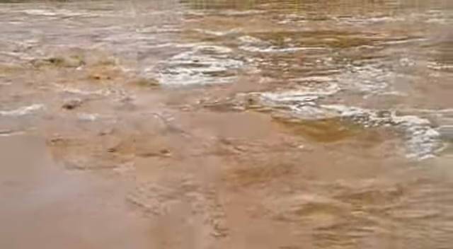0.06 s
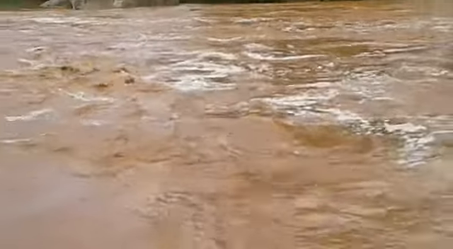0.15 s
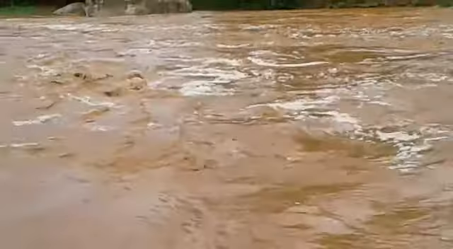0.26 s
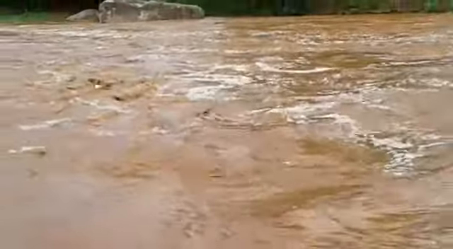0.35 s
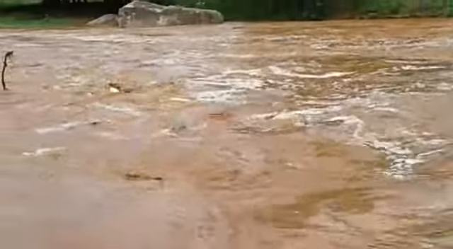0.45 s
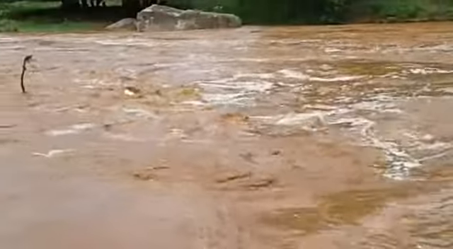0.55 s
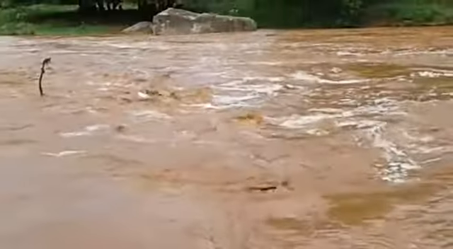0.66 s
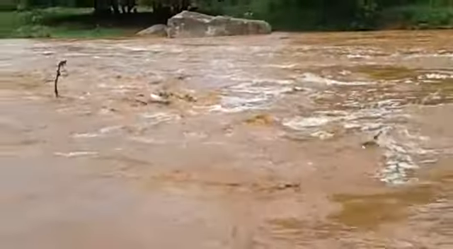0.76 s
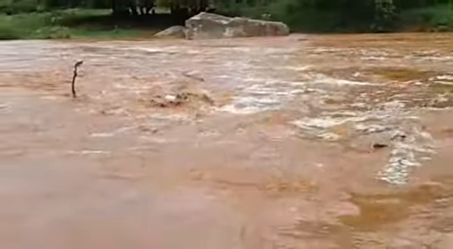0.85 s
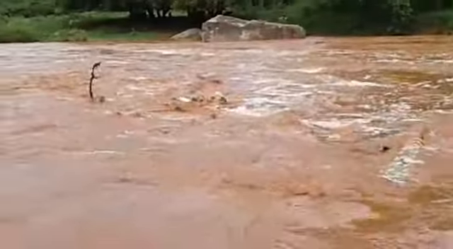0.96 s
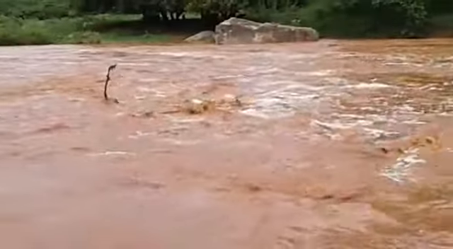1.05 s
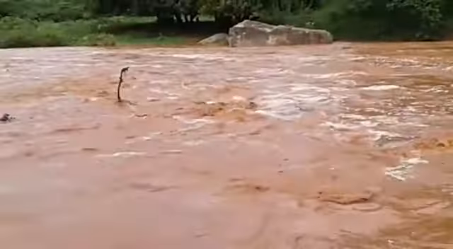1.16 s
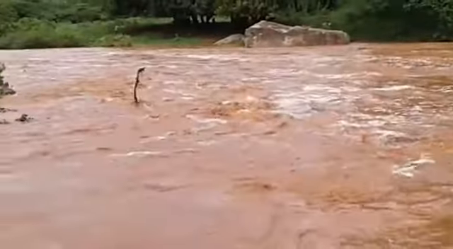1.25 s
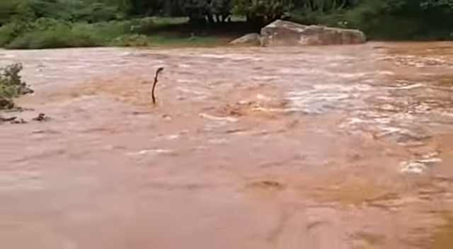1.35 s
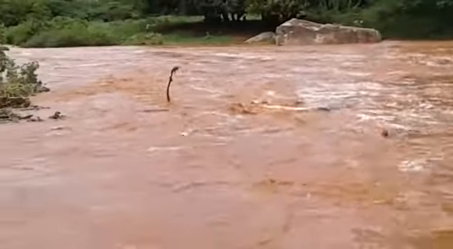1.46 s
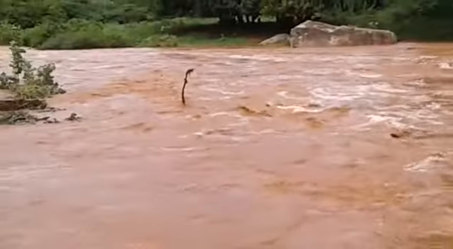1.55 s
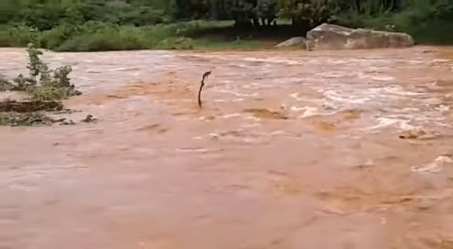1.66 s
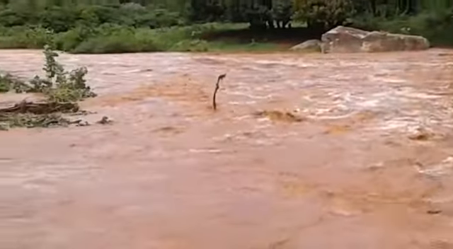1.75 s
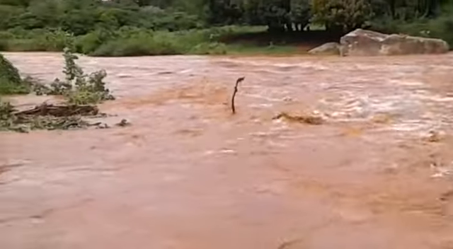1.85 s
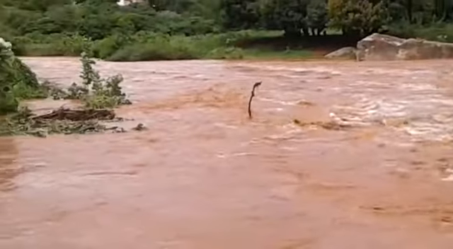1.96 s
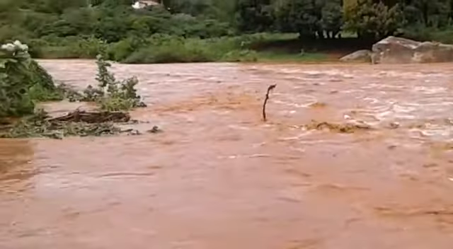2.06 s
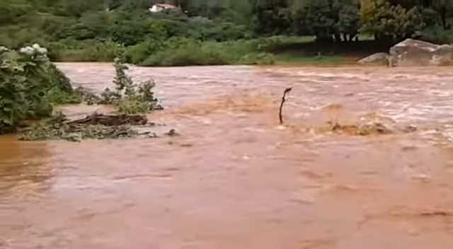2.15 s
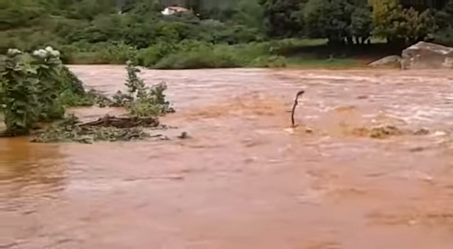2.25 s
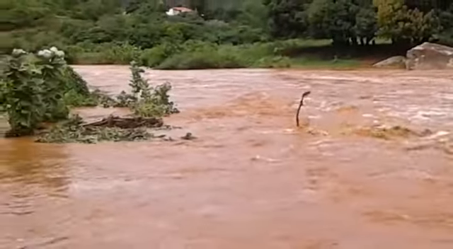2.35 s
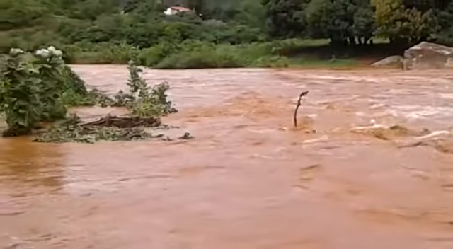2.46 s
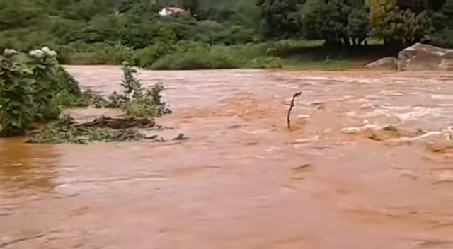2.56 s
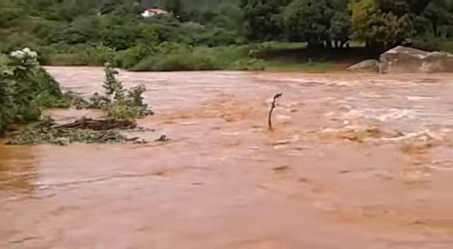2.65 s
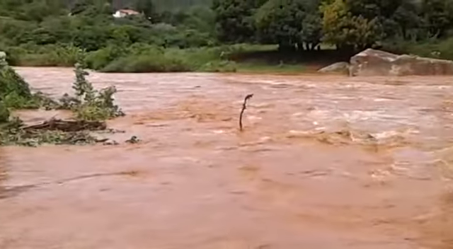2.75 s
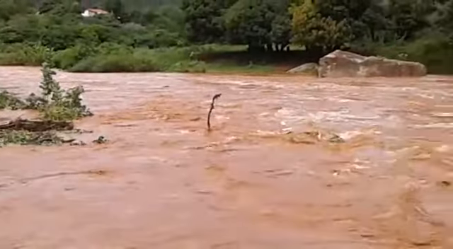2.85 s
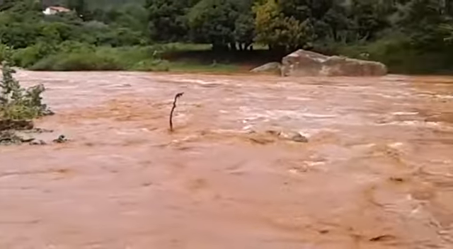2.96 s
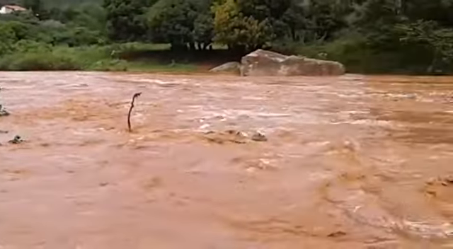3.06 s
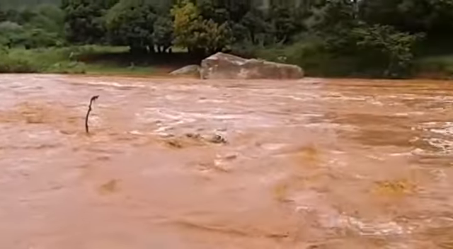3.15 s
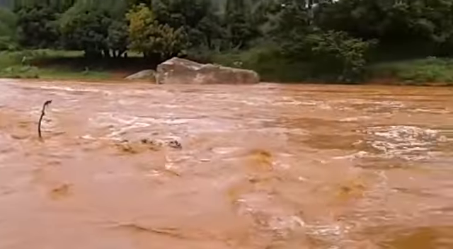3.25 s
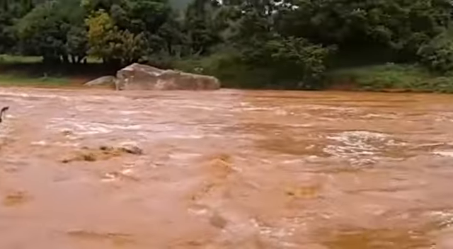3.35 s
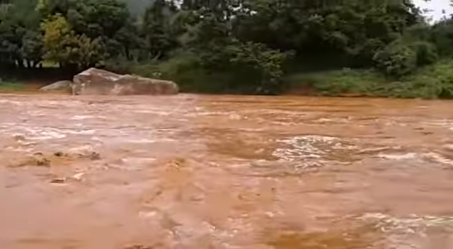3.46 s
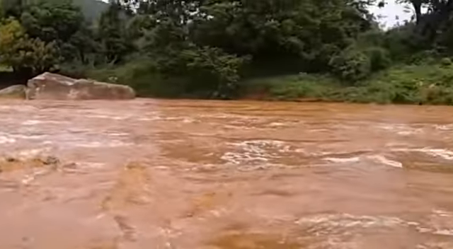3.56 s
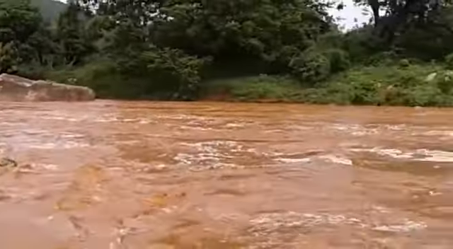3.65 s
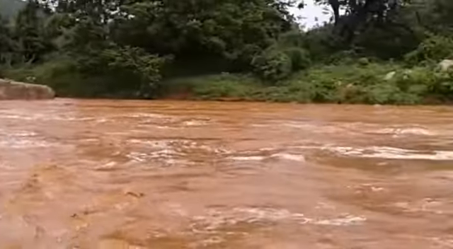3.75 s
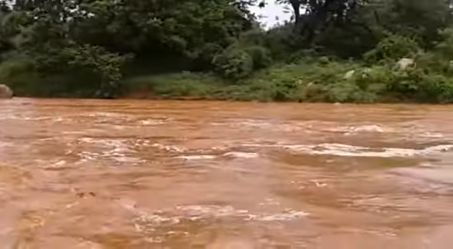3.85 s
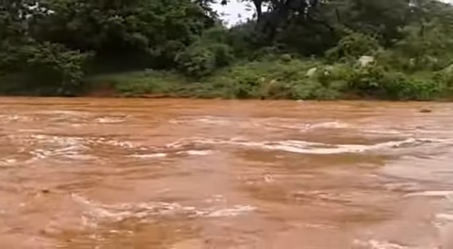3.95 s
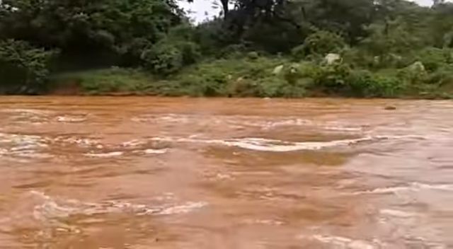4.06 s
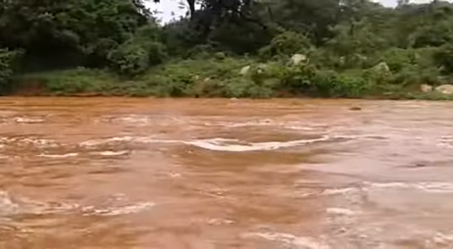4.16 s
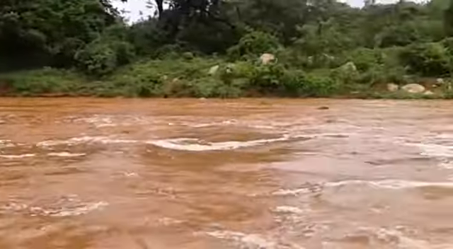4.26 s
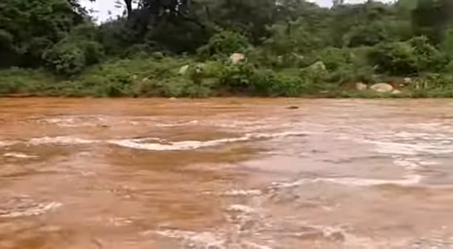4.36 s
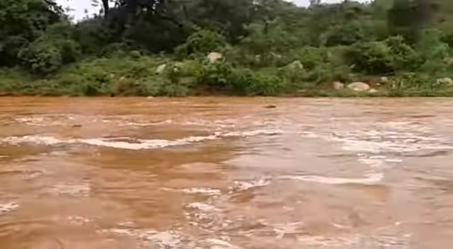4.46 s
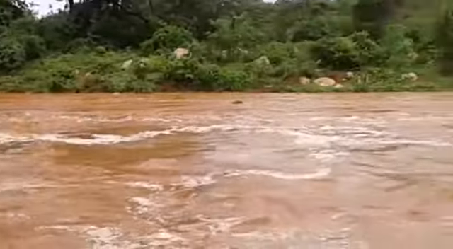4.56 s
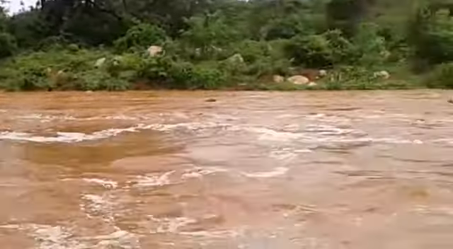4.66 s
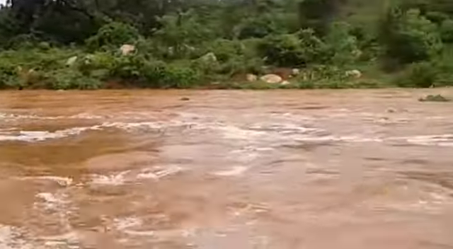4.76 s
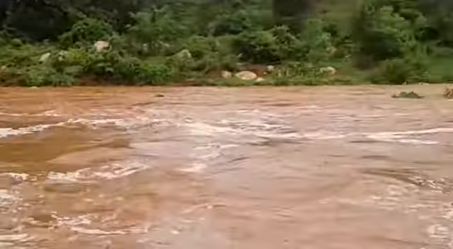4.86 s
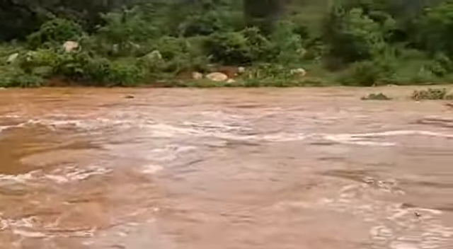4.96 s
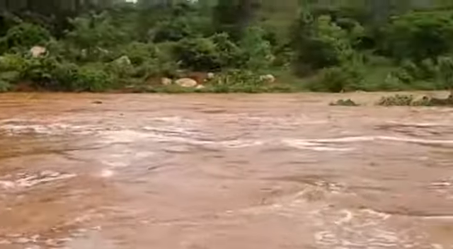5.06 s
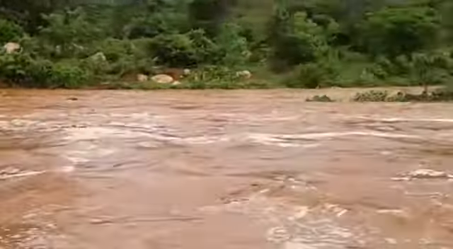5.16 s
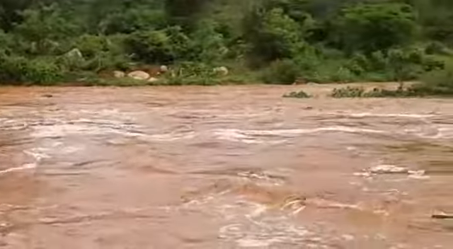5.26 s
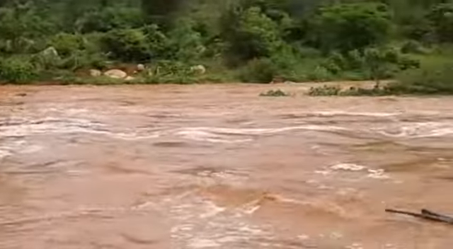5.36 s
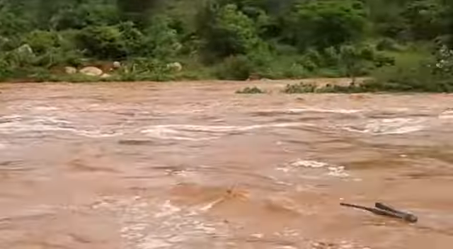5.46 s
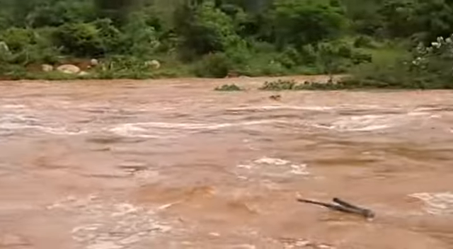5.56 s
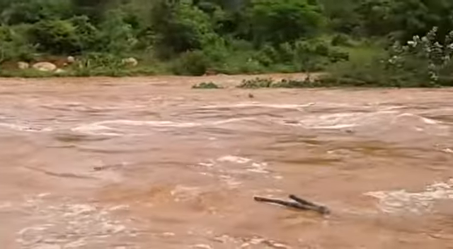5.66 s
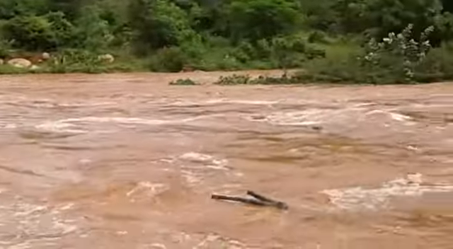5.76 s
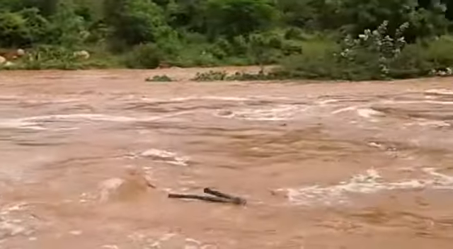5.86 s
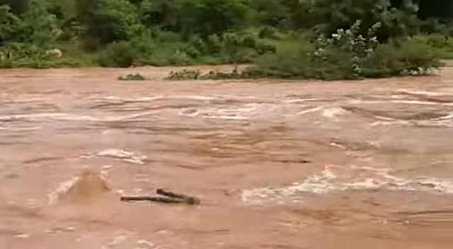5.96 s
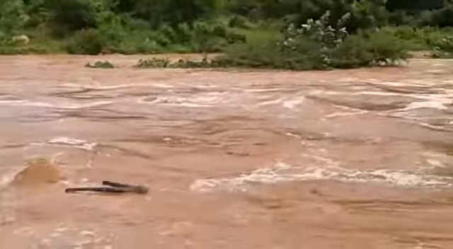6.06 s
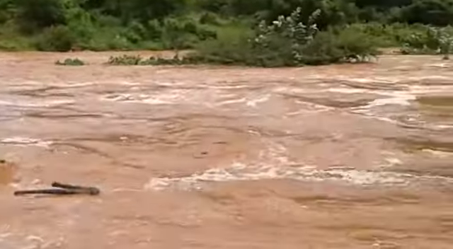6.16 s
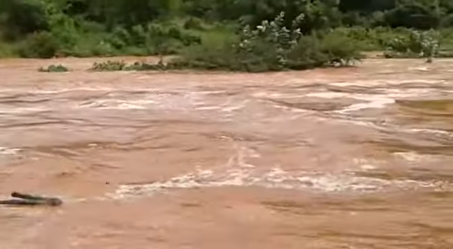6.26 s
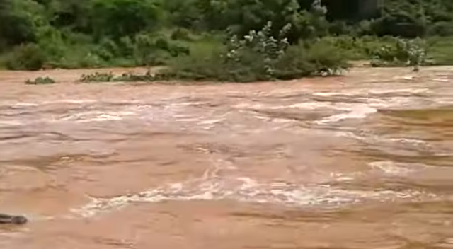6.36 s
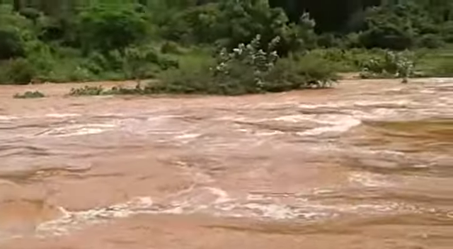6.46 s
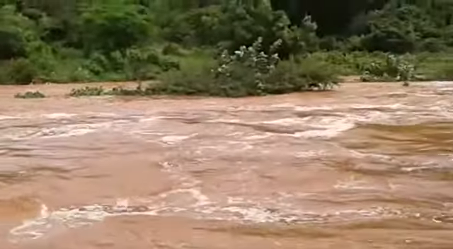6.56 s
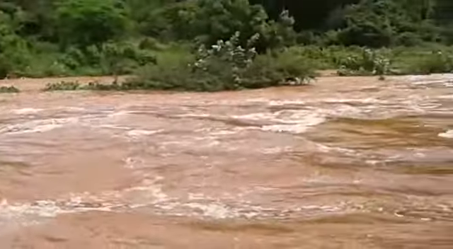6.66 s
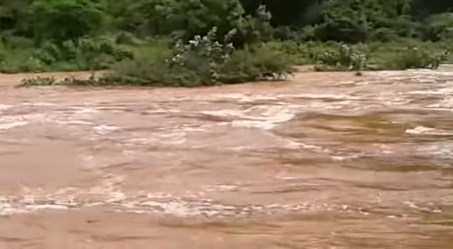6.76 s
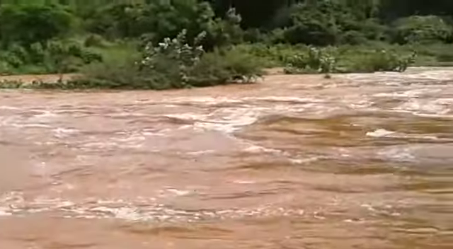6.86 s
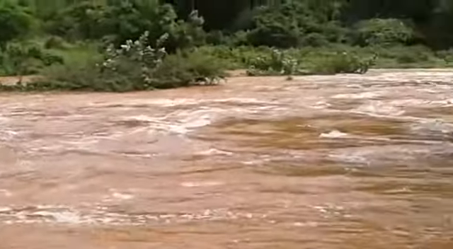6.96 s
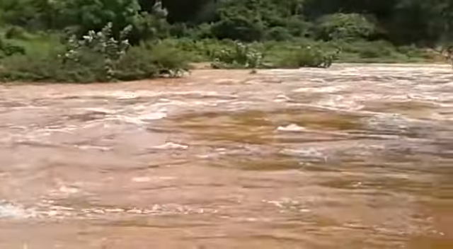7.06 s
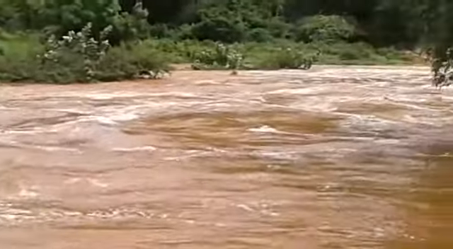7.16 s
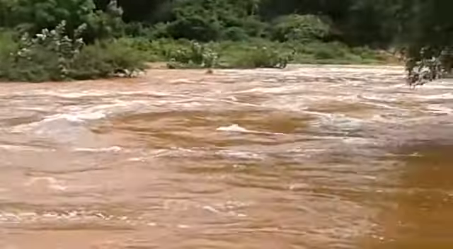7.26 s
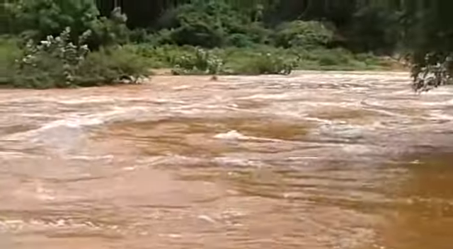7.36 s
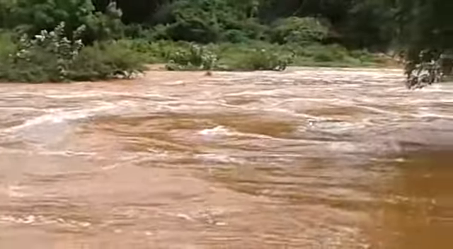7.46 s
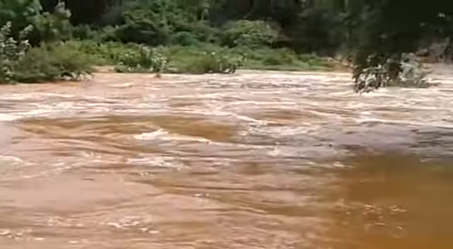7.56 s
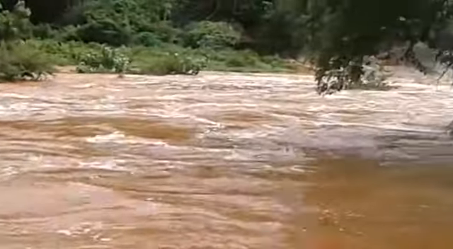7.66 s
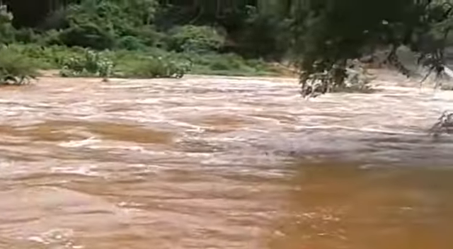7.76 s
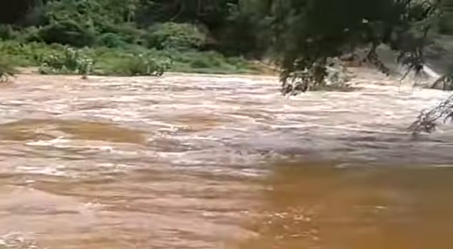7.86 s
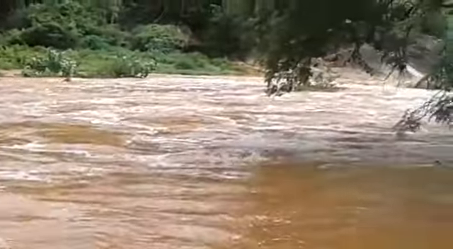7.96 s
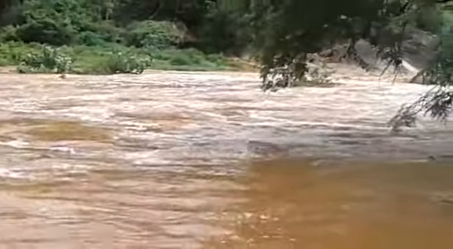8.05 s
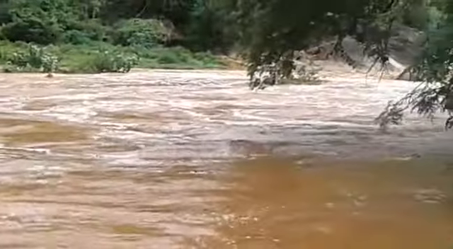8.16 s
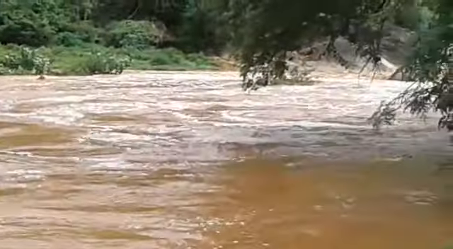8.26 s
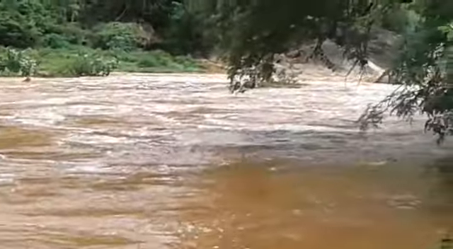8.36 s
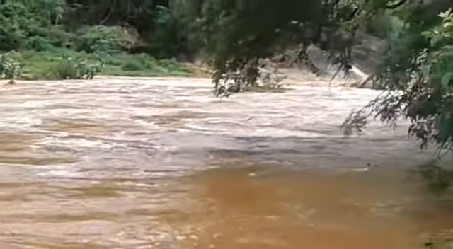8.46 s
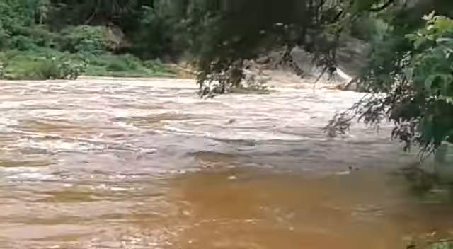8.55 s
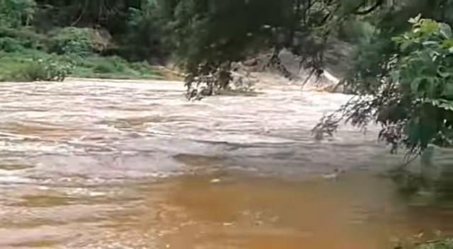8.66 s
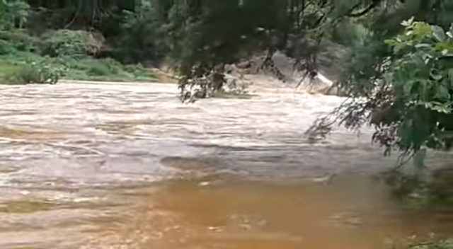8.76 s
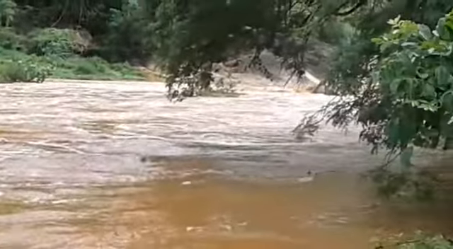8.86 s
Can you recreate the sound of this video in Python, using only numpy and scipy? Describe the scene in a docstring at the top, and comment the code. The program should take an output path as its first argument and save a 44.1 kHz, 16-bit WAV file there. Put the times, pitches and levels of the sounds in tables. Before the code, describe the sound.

After a moment of silence, dense river roar fades in and stays constant, with splashes and soft gurgles. Far off, a high insect buzz pulses and a small bird sings gliding whistles around the middle. Occasional close drips pop out. Later, hard clicks, thumps and short rubs from fingers on the hand-held microphone rise above the muffled water, which brightens sharply at the end.

```python
"""A swollen river rushes past a small hand-held microphone: shaped noise, with bubbles ringing in the eddies.
On the far bank a bird sings in gliding whistles and an insect trills, a tone struck in quick pulses.
Small ticks and drips fall close by. Late on, fingers shift on the casing: they knock (spikes and a swing back),
rub in short strokes of noise, creep with a low rumble and half cover the port, dulling the water."""
import sys
import numpy as np
from scipy import signal
from scipy.fft import rfft, irfft
from scipy.io import wavfile
from scipy.ndimage import uniform_filter1d

SR = 44100
rng = np.random.default_rng(int(sys.argv[2]) if len(sys.argv) > 2 else 0)


def volts(x):
    """Linear amplitude factor 10**(x/20) for a level x in dB, scalar or array-like."""
    e = np.asarray(x, float) / 20
    return 10 ** e


def unload_wav(signal):
    """Save mono or channel-first audio to the path in sys.argv[1] as 16-bit WAV at rate SR, clipped to [-1, 1]."""
    wavfile.write(
        sys.argv[1],
        SR,
        np.round(np.clip(np.atleast_2d(signal).T, -1, 1) * 32767).astype(np.int16),
    )


N = 392931  # length [samples]


def evened(x):
    """Scales to rms 1."""
    return x / np.sqrt(np.mean(x ** 2) + 1e-20)


def read(points, hz):
    """Reads a spectrum on a log-frequency axis."""
    f, value = np.transpose(points)
    return np.interp(np.log(hz + 1), np.log(f + 1), value)


def add(mix, s, sound):
    """Mixes a sound in at time s."""
    part = mix[round(s * SR):][:len(sound)]
    part += sound[:len(part)]


def coloured(x, db_of_hz):
    """Filters x by a gain curve in dB, then scales it to rms 1."""
    gain = volts(db_of_hz(np.fft.rfftfreq(len(x), 1 / SR)))
    return evened(irfft(rfft(x) * gain, len(x)))


def ramp(t, s, takes_s):
    """Rises in a straight line from 0 to 1, starting at s."""
    return np.clip((t - s) / takes_s, 0, 1)


def insect(hz=5160, wander_hz=55, pulses_per_s=56):
    """A thin distant trill: one wing tone, a little unsteady, struck in quick regular pulses."""
    # bouts, added to the resting trill: (start [s], end [s], level [dB])
    trill_bouts = [(.2, 1.85, -70), (3.35, 5.4, -67), (5.45, 6.2, -64)]
    rest_db, swell_s = -77, .3
    drift = evened(uniform_filter1d(rng.standard_normal((2, N)), size=500, axis=1))
    tone = np.sin(2 * np.pi * np.cumsum(hz + wander_hz * drift[0]) / SR)
    pulse_turns = np.cumsum(pulses_per_s * (1 + .06 * drift[1])) / SR
    throb = (1 + np.cos(2 * np.pi * pulse_turns)) ** 1.4
    t = np.arange(N) / SR
    bouts = sum(volts(db) * ramp(t, s, swell_s) * ramp(-t, -end, swell_s) for s, end, db in trill_bouts)
    rest = volts(rest_db) * (t < trill_bouts[-1][1])  # stops with the last bout
    return (rest + bouts) * evened(tone * throb)


def note(db, pitch):
    """A bird's whistle: nearly a sine, softened at both ends, with scattered echoes off the far trees."""
    ends_db = -4  # a note swells to its middle
    higher_db_per_khz = -2.5  # above 4.5 kHz the bird is fainter, below it stronger
    flutter_db = 3  # rms flicker of a note on its way across the water
    s, hz = np.transpose(pitch)
    t = np.arange(s[0], s[-1], 1 / SR)
    glide_hz = np.interp(t, s, hz)
    tone = np.sqrt(2) * np.sin(2 * np.pi * np.cumsum(glide_hz) / SR)
    tone *= volts(db + ends_db * np.linspace(-1, 1, len(t)) ** 2)
    tone *= signal.windows.tukey(len(t), .3)
    tone *= volts(higher_db_per_khz * (glide_hz / 1000 - 4.5))
    flutter = evened(uniform_filter1d(rng.standard_normal(8192), size=300))
    tone *= volts(flutter_db * flutter[:len(t)])
    # echoes die by 60 dB in 0.31 s; together they lie 8 dB under the direct whistle
    echoes = rng.standard_normal(6000) * volts(-60 * np.arange(6000) / SR / 0.31)
    echoes *= volts(-8.0) / np.linalg.norm(echoes)
    echoes[0] = 1  # the direct whistle
    return s[0], signal.oaconvolve(tone, echoes)


def bubbles(cycles=9, glide=.25, spread_db=4, count=14):
    """Pockets of air ring briefly in the eddies, rising in pitch; small ones are fainter."""
    level_db, per_s, low_hz, high_hz = -48.5, 150, 450, 2200
    out = np.zeros(N)
    for hz in np.geomspace(low_hz, high_hz, count):
        turns = np.arange(4000) * hz / SR
        blip = np.sin(2 * np.pi * turns * (1 + glide * turns / (4 * cycles)))
        blip *= np.exp(-2 * turns / cycles) * np.minimum(turns / 2, 1)
        strength = volts(spread_db * np.minimum(rng.exponential(1, N), 3))
        strikes = strength * (rng.random(N) < per_s / count / SR)
        out += signal.oaconvolve(strikes, blip)[:N] * (low_hz / hz) ** .3
    return volts(level_db) * evened(out)


def tick(s, db, hz, cycles):
    """A tick or drip close by: a few cycles that swell at once and die."""
    turns = np.arange(1500) * hz / SR
    envelope = np.exp(-2 * turns / cycles) * np.minimum(4 * turns / cycles, 1)
    return s, volts(db) * np.sin(2 * np.pi * turns) * envelope


def creep(hz=220, width_hz=130):
    """Skin creeps on the casing: surges of lumpy low noise in its main resonance."""
    # surges: (time of the top [s], level before a 5.5 dB trim [dB], build by 20 dB [s], die by 20 dB [s])
    surges = [(6.094, -23, .05, .06), (6.212, -28, .04, .35), (6.508, -18.5, .065, .016),
              (7.062, -31, .04, .4), (7.26, -18, .08, .02), (7.328, -18, .02, .037),
              (7.672, -23.5, .18, .2), (7.802, -20.5, .033, .048), (7.988, -20.5, .074, .032),
              (8.22, -18, .035, .04), (8.29, -27, .2, .02)]
    t = np.arange(N) / SR
    slopes_db = [db - 20 * np.maximum((s - t) / build_s, (t - s) / die_s) for s, db, build_s, die_s in surges]
    level_db = np.max(slopes_db, axis=0)
    noise = rng.standard_normal(N + N % 2)
    rumble = coloured(noise, lambda f: -10 * np.log10(1 + ((f - hz) / width_hz) ** 4))
    return volts(level_db - 5.5) * rumble[:N]


def rub(s, length, db, change_db, tilt_db):
    """Skin slips in dense uneven clicks; the stroke starts and stops at once."""
    # shape of the rubbing noise, with next to nothing above 15.75 kHz: (frequency [Hz], density [dB per Hz])
    rub_spectrum = [(30, -34), (60, -10), (190, -3), (600, -3), (1000, -2.5), (1550, -5.5), (2500, -5.5),
                    (3300, -13), (4800, -18), (7500, -30), (10500, -43), (12000, -46), (14000, -36),
                    (15750, -37), (15900, -70)]
    ends_db = -3.5  # pressure bulges mid-stroke
    draw = rng.standard_normal((2, 8192))
    slips = draw[0] * volts(3.0 * evened(uniform_filter1d(draw[1], size=40)))
    hiss = coloured(slips, lambda f: read(rub_spectrum, f) + tilt_db * np.log2(f / 1000 + 0.055))
    count = int(np.clip(length * SR, 8, 8192))
    along = np.linspace(-1, 1, count)
    pressure_db = db + change_db * along / 2 + ends_db * along ** 2
    return s, hiss[:count] * volts(pressure_db) * signal.windows.tukey(count, min(1, 120 / count))


def knock(s, spike_db, width_ms, back_db, sign):
    """A short spike of pressure one way, then the casing swings back the other way and settles."""
    # the casing mode that swings back: (frequency [Hz], time to die by 60 dB [s])
    hz, t60 = (165, 0.017)
    t = np.arange(-100, 3000) / SR
    spike = volts(spike_db) * np.exp(-abs(t * 1000 / max(width_ms, .05)) ** 1.7)
    after = np.maximum(t, 0)
    back = volts(back_db - 60 * after / t60) * np.sin(2 * np.pi * hz * after)
    return s + t[0], np.sign(sign) * (spike - back)


def river(patchy_db=1.1, flicker_db=0.39, splash_db=1.0, splashes_per_s=3000, splash_share=0.27):
    """Dense roar with drifting patches plus countless splashes, dulled when the port is covered."""
    # shape of the noise with the port open, next to nothing above 15.75 kHz: (frequency [Hz], density [dB per Hz])
    noise_spectrum = [(40, -23), (95, 1), (170, 2.5), (330, -1.5), (450, -6), (660, -6), (1000, -10),
                      (2200, -14.6), (3200, -24.3), (5000, -34), (7000, -47), (9500, -58.5), (11800, -62.5),
                      (14200, -52), (15750, -51.5), (15900, -85)]
    # how a finger over the port dulls: (frequency [Hz], share of the cover loss [1])
    cover = [(100, 0.026), (600, 0.029), (1500, 0.34), (4000, 0.83), (8000, 0.077), (14000, 0.0024)]
    # slow swell of the water: (time [s], level [dB])
    surge = [(0, -1.5), (1.3, .5), (2, -.5), (2.8, .5), (4.7, -.2), (6.3, .7), (6.9, 0), (8.4, -.7),
             (8.7, 0), (8.91, -.8)]
    # nearer rapids: (time [s], gain at the top of the spray band, close to 6 kHz [dB])
    nearer_rapids = [(.3, 3.2), (3.8, 2.5), (6.1, 5.5), (6.5, 1), (8.59, 5), (8.67, 13.5), (8.8, 13.5),
                     (8.91, 18)]
    water_db = -34.7  # before the swell and the spray
    louder_per_spray_db = .2  # the river gains a little as the port turns to nearer rapids
    hand_s = (6.3, 6.85, 8.15, 8.55)  # a finger slides on, covers most, has eased, is off
    hand_db = (0, 10, 6.5, 0)  # cover loss, scaled at each frequency by its share

    size = volts(splash_db * np.minimum(rng.exponential(1, N), 5))
    size *= rng.random(N) < splashes_per_s / SR
    splashes = evened(size * rng.standard_normal(N))
    raw = np.sqrt(1 - splash_share) * rng.standard_normal(N) + np.sqrt(splash_share) * splashes
    hz, t, z = signal.stft(raw, SR, nperseg=1024, noverlap=768)

    patches = rng.standard_normal((len(t), len(hz))).T
    patches = uniform_filter1d(patches, size=10, axis=0)
    patches = evened(uniform_filter1d(patches, size=12, axis=1))
    flicker = evened(uniform_filter1d(rng.standard_normal(len(t)), size=5))

    spray_db = np.interp(t, *np.transpose(nearer_rapids))
    level_db = water_db + np.interp(t, *np.transpose(surge)) + louder_per_spray_db * spray_db
    cover_db = np.interp(t, hand_s, hand_db)
    shape = volts(read(noise_spectrum, hz))
    shape /= np.sqrt(np.mean(shape ** 2))
    field_db = level_db - np.outer(read(cover, hz), cover_db)
    spray = np.exp(-(np.log2(hz / 6000 + 0.0084) / 1.02) ** 2)  # fine spray fills a broad treble band
    field_db += np.outer(spray, spray_db)
    z = z * shape[:, None] * volts(field_db + patchy_db * patches + flicker_db * flicker)
    return signal.istft(z, SR, nperseg=1024, noverlap=768)[1][:N]


def scene():
    """Far bank, water and hand, mixed at the microphone."""
    # bird notes: (level before the pitch tilt [dB], pitch as (time [s], frequency [Hz]))
    bird_notes = [(-57, [(2.005, 6950), (2.035, 6900)]), (-54, [(2.033, 5700), (2.057, 5000)]),
                  (-63, [(4.02, 4600), (4.045, 4050), (4.1, 3200)]), (-54, [(4.165, 4050), (4.206, 4455),
                  (4.235, 4390), (4.305, 3520)]), (-54, [(4.3, 2750), (4.345, 2700)]), (-50, [(4.41, 4800),
                  (4.44, 5240), (4.48, 5290)]), (-51, [(4.53, 4770), (4.556, 4990), (4.65, 5020)]),
                  (-54, [(4.69, 5740), (4.728, 5640), (4.758, 4540), (4.79, 4100), (4.83, 3250)]),
                  (-51, [(4.94, 5330), (4.962, 5200), (4.99, 4070), (5.003, 3850)]), (-58, [(5.075, 4290),
                  (5.104, 5340), (5.148, 5530)]), (-52, [(5.148, 5200), (5.172, 4450), (5.195, 3800)])]
    # finger strokes: (time [s], length [s], level [dB], change first to last [dB], brightness [dB per octave])
    strokes = [(6.069, 0.0168, -32, 0, -1.5), (6.093, 0.06, -23.5, -1, 1), (6.208, .037, -25.5, -11, -0.5),
               (6.285, 0.0086, -25, -14, -3.5), (6.423, .08, -20.5, 0, 0), (7.651, 0.015, -27, 2, -3),
               (7.67, .006, -33, 4, -4), (7.682, 0.0073, -28, -5, -1), (7.696, .018, -26, 3, -3.5),
               (7.719, 0.0223, -31, 1, 0), (7.791, 0.015, -24.5, -9, -1.5), (7.92, 0.013, -26, -6, -6),
               (7.939, 0.019, -31, -5, -3.5), (7.977, .019, -25, -4.5, -0.5), (8.193, .024, -25.5, 9, -.5),
               (8.215, .023, -25.5, -10, -.5)]
    # knocks on the casing: (time [s], spike peak [dB], spike width [ms], swing-back starting level [dB],
    # push +1 or pull -1)
    knocks = [(6.0924, -17, .42, -10, -1), (6.095, -17.5, 4.5, -40, 1), (6.1095, -24, .4, -15, -1),
              (6.2124, -6, .09, -17, 1), (6.283, -7, .12, -13, 1), (6.4269, -9.5, .24, -11.5, 1),
              (7.0595, -17, .3, -19, -1), (7.0645, -17, .6, -24, -1), (7.0851, -11.5, .23, -13, -1),
              (7.1053, -23, .6, -20, -1), (7.2329, -21, .6, -19, -1), (7.2459, -19, .55, -21, -1),
              (7.2518, -16, .2, -28, -1), (7.257, -14, .22, -17, -1), (7.2715, -20, .5, -23, -1),
              (7.3236, -8.5, .2, -11.5, -1), (7.3416, -15.5, .11, -13, -1), (7.6562, -31, .4, -17, -1),
              (7.671, -15, .18, -13.5, -1), (7.6831, -18, .29, -11, -1), (7.7003, -16, .2, -18, -1),
              (7.7215, -18, .32, -18, -1), (7.7382, -16, .18, -17, 1), (7.7971, -17.5, .24, -13, -1),
              (7.9225, -8.5, .15, -14, -1), (7.949, -16, .28, -20, -1), (7.9805, -11, .46, -15, -1),
              (7.9868, -7, .58, -15, -1), (8.1905, -7, .24, -14, -1), (8.2113, -15, .4, -17, 1),
              (8.215, -10, .13, -20, -1), (8.2163, -1.5, .13, -2.5, -1), (8.637, -16.5, .35, -23, -1),
              (8.6451, -12, .15, -27, -1)]
    # ticks and drips close by: (time [s], level before the envelope [dB], frequency [Hz], length [cycles])
    ticks = [(2.203, -45, 4200, 6), (2.3, -48, 3600, 6), (2.781, -22, 1720, 10), (2.87, -41, 5000, 8),
             (3.872, -27, 1400, 14), (4.123, -56, 8000, 2), (5.278, -27, 9000, 1.5), (8.662, -23, 1440, 16),
             (8.684, -40, 3500, 10)]
    mix = insect() + bubbles() + creep() + river()
    for play, table in ((note, bird_notes), (tick, ticks), (rub, strokes), (knock, knocks)):
        for row in table:
            add(mix, *play(*row))
    return mix[None]


def low_pass(x):
    """Removes everything above the highest recorded frequency."""
    return signal.sosfilt(signal.butter(12, 16810, fs=SR, output="sos"), x)


def record(dry):
    """Silence at first, then a short fade-in, and a bass cut below 50 Hz."""
    start_s, fade_s = .262, .28
    fade = ramp(np.arange(N) / SR, start_s, fade_s) ** 0.98
    finished = signal.lfilter(*signal.butter(2, 50.0, "high", fs=SR), dry * fade)
    return low_pass(finished)


dry = scene()
out = record(dry)
unload_wav(out)
```